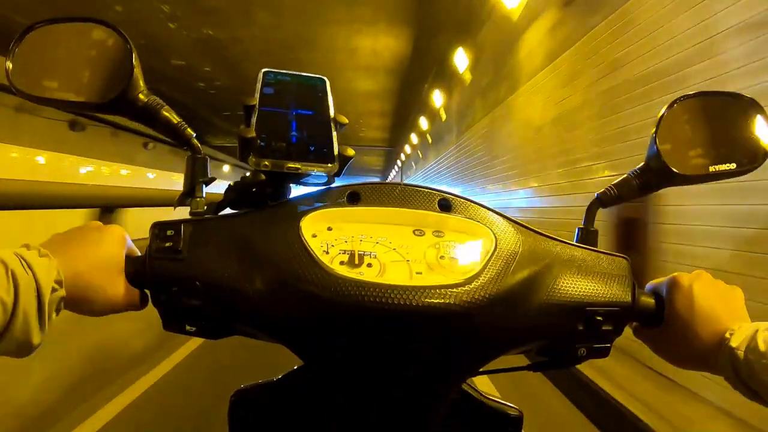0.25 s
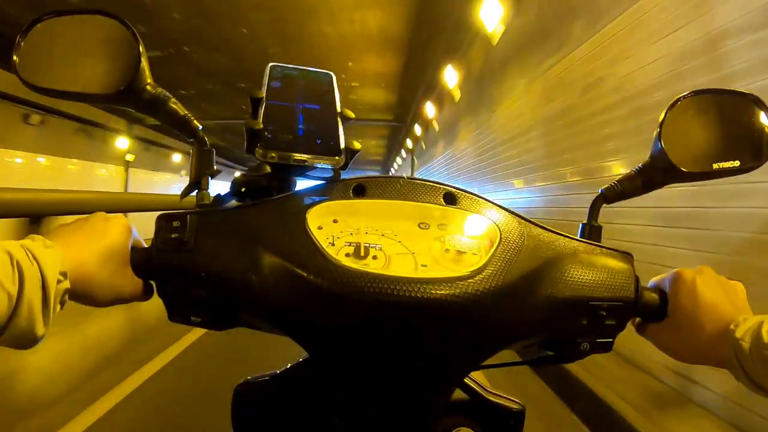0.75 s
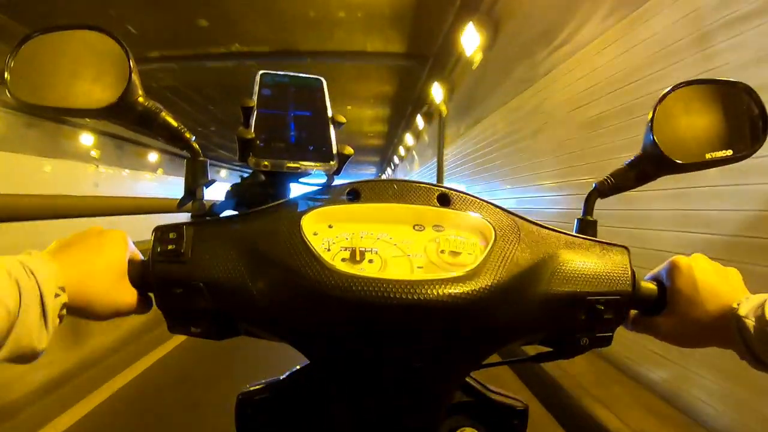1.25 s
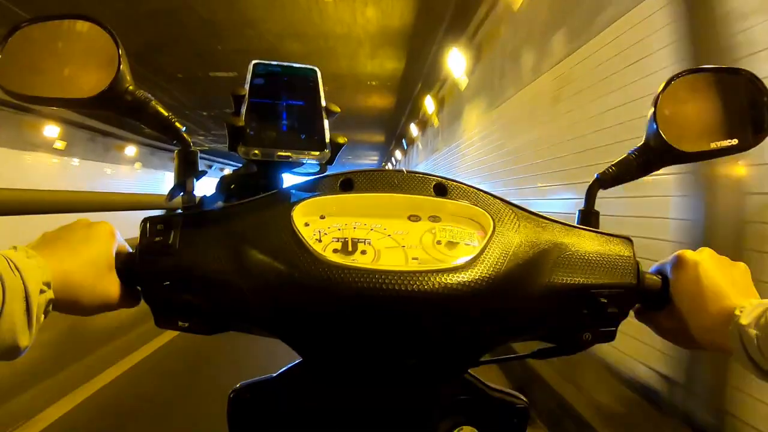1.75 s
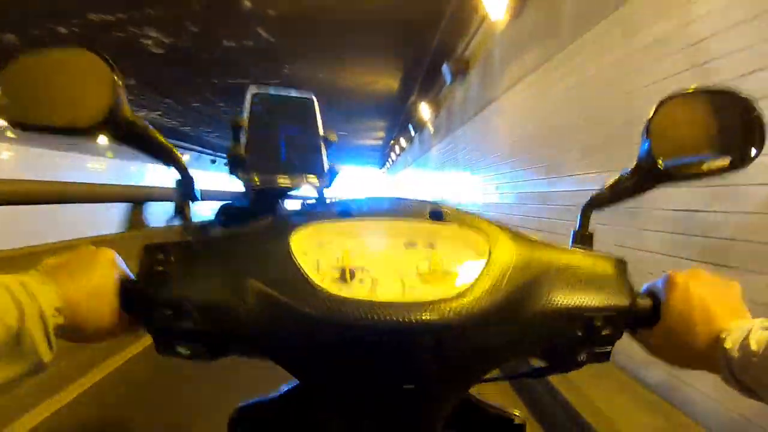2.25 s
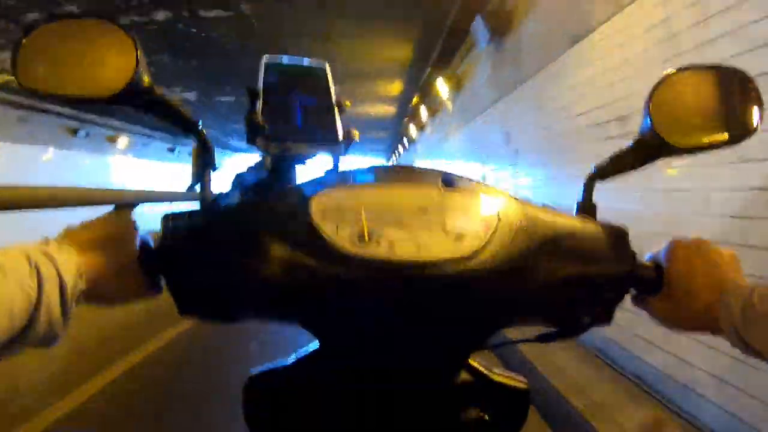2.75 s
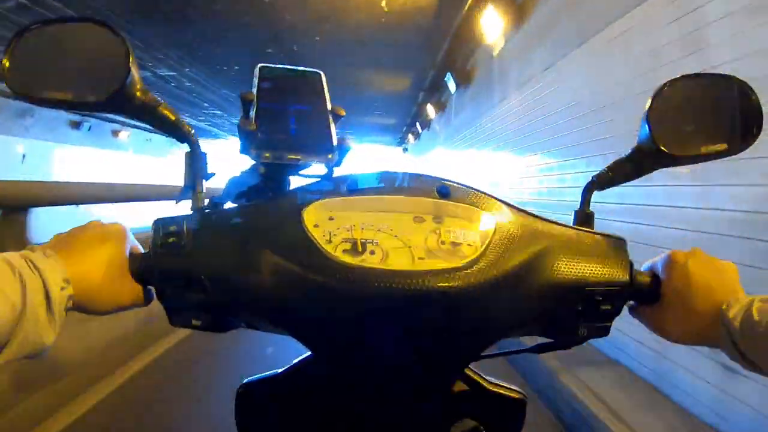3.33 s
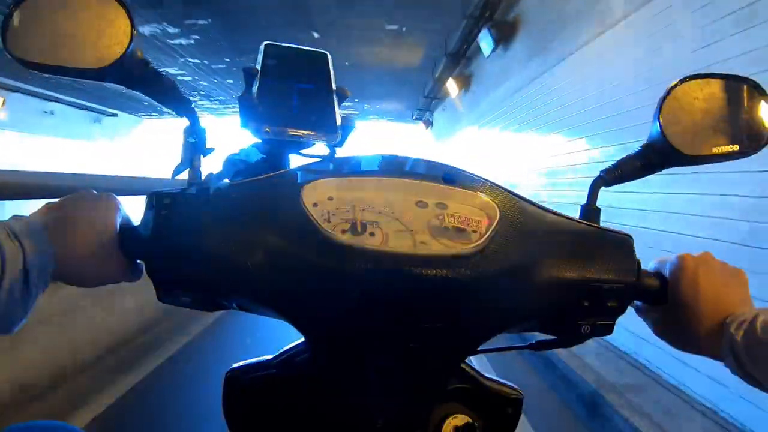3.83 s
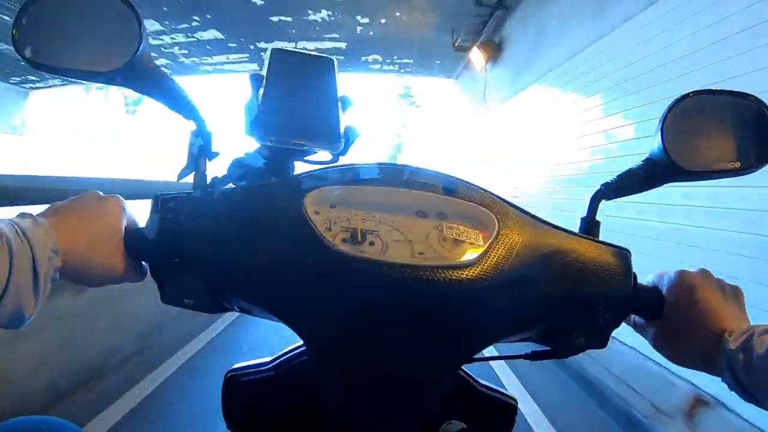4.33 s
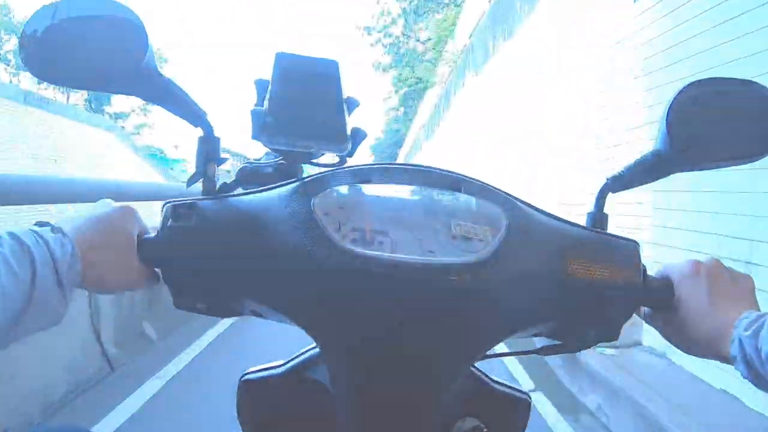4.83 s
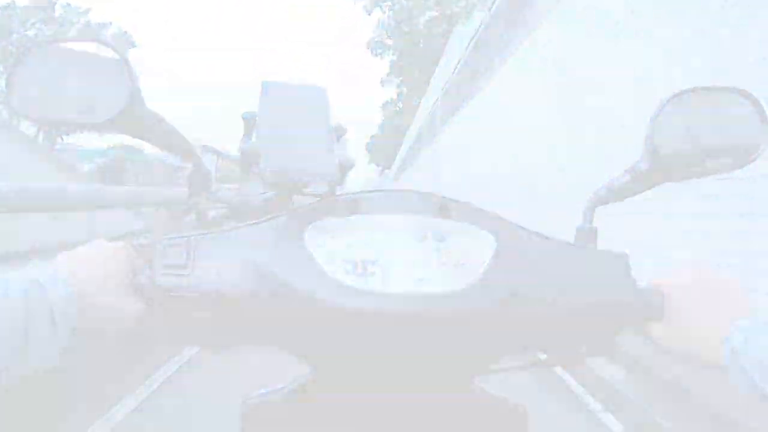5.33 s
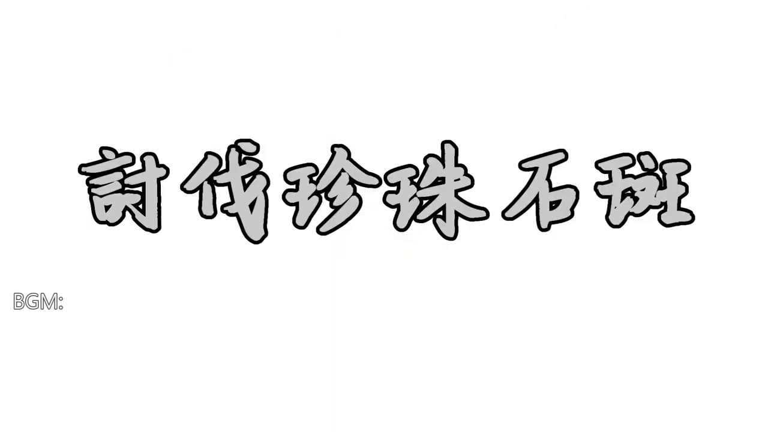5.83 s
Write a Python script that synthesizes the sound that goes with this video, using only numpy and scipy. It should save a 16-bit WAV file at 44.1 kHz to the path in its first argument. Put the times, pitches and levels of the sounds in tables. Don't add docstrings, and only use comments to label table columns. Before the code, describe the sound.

Heavy wind rumble and tunnel roar surround a humming scooter engine, with rattling plastic and dull panel knocks until the sound stops dead.

```python
import sys
import numpy as np
from scipy import signal
from scipy.fft import rfft, irfft, next_fast_len
from scipy.io import wavfile
from scipy.ndimage import uniform_filter1d, minimum_filter1d, map_coordinates

SR = 44100
rng = np.random.default_rng(int(sys.argv[2]) if len(sys.argv) > 2 else 0)


def pcm_store(signal):
    levels = np.round(np.clip(np.atleast_2d(signal), -1, 1) * 32767)
    wavfile.write(sys.argv[1], SR, levels.astype(np.int16).T)


def boost_factor(decibels):
    exponent = np.asarray(decibels, float) / 20
    return 10 ** exponent


N = 268200


def unit(x):
    return x / np.sqrt(np.mean(x ** 2) + 1e-20)


def curves(rows):
    s, *cols = np.transpose(rows)
    return [np.interp(np.arange(N) / SR, s, c) for c in cols]


def coarse(shape):
    t = np.arange(0, N / SR, .002)
    return np.interp(np.arange(N) / SR, t, shape(t))


def wobble(rate):
    knots = rng.standard_normal(int(N * rate / SR) + 4)
    return coarse(lambda t: map_coordinates(knots, [t * rate]))


def humps(rows):
    return coarse(lambda t: sum(db * np.exp(-2 * ((t - s) / width) ** 2) for s, db, width in rows))


def filtered(x, response):
    m = next_fast_len(N + 8192)
    return irfft(rfft(x, m) * response(np.fft.rfftfreq(m, 1 / SR)), m)[:N]


def rush(spectrum, patchy_db):
    z = signal.stft(rng.standard_normal(N), nperseg=512)[2]
    field = uniform_filter1d(rng.standard_normal(z.shape), size=6, axis=0)
    field = uniform_filter1d(field, size=10, axis=1)
    x = signal.istft(z * boost_factor(patchy_db * unit(field)), nperseg=512)[1][:N]
    hz, db = np.transpose(spectrum)
    return unit(filtered(x, lambda f: boost_factor(np.interp(np.log(f + 1), np.log(hz), db))))


def tone(cycles, db, unsteady_db, drift):
    size_db = unsteady_db * (0.62 * wobble(7) + 0.75 * wobble(24))
    return np.sqrt(2) * boost_factor(db + size_db) * np.sin(2 * np.pi * cycles + drift * wobble(9))


def blips(s, db, hz, rise):
    u = np.arange(1 + int(14 * rise * SR)) / SR / rise
    envelope = (u / 2) ** 2 * np.exp(2 - u)
    rows = boost_factor(db)[:, None] * envelope * np.sin(2 * np.pi * np.outer(hz, u * rise))
    at = (s * SR).astype(int)[:, None] + np.arange(len(u))
    return np.bincount(at.ravel(), rows.ravel(), N + len(u))[:N]


# time_s, firing_rate_hz
ENGINE_SPEED = [(0, 42.75), (.6, 43.2), (.95, 43.2), (1.3, 41.85), (1.6, 40.9), (1.85, 40.6), (2.1, 41.13),
                (2.5, 41.7), (2.8, 41.85), (3.6, 41.87), (4.2, 43.13), (4.6, 43.48), (5.53, 44.1)]


def firing():
    rate, = curves(ENGINE_SPEED)
    return rate, np.cumsum(rate) / SR


# order, level_db
STEADY_ORDERS = [(1, -41), (2, -41), (5, -45), (16, -57), (23, -55), (24, -59), (29, -59), (33, -56),
                 (34, -58), (37, -54), (38, -56), (58, -63), (60, -63)]
# order, start_s, length_s, level_db
BOOMS = [(8, .07, .45, -41), (8, .77, .2, -37), (8, .8, .55, -43), (8, 2.0, .3, -48), (8, 2.52, .2, -40),
         (8, 2.8, .33, -39), (8, 3.2, .27, -45), (8, 3.7, .58, -40), (8, 3.88, .33, -33.5),
         (8, 4.28, .5, -40), (8, 4.85, .75, -44), (8, 5.3, .3, -42), (9, 0, .5, -42), (9, .95, .35, -46),
         (9, 1.95, .28, -47), (9, 2.35, .32, -41), (9, 2.72, 1.22, -44), (9, 3.55, .15, -48),
         (9, 4.06, .58, -40), (9, 4.75, .35, -41), (11, .1, .6, -52), (11, 1.77, 1.35, -45),
         (11, 2.38, .25, -46), (11, 4.13, .35, -47), (11, 4.55, .72, -44), (11, 5.33, .2, -46),
         (4, .15, .25, -40), (4, .45, .32, -35), (4, 1.25, .2, -39), (4, 1.95, .45, -38),
         (4, 2.55, .6, -36.5), (4, 3.25, .5, -39), (4, 4.5, .55, -36), (4, 5.05, .45, -41),
         (12, 3.85, .45, -52), (12, 0, .7, -53), (36, 1.9, .25, -53), (36, 3, .6, -56),
         (36, 3.83, .22, -50), (36, 4.25, .6, -53), (36, 5.1, .2, -51)]


def engine():
    turns = firing()[1]
    rest_db, rise_s = -55.5, .12

    def swell(t, start, length):
        edge = np.minimum(t - start, start + length - t)
        return np.clip(edge / rise_s + .5, 0, 1)

    def size(k):
        spells = [row[1:] for row in BOOMS if round(row[0]) == k]
        return boost_factor(rest_db) + coarse(lambda t: sum(boost_factor(db) * swell(t, s, length) for s, length, db in spells))

    lifted = sum(size(k) * tone(k * turns, 0, unsteady_db=1.5, drift=.7) for k in (4, 8, 9, 11, 12, 36))
    steady = sum(tone(np.round(k) * turns + rng.random(), db, unsteady_db=4.5, drift=0.65)
                 for k, db in STEADY_ORDERS)
    return lifted + steady


# time_s, mesh_rate_hz
GEAR_MESH = [(0, 2700), (.15, 2712), (.45, 2722), (1, 2717), (1.6, 2673), (3.5, 2630), (3.8, 2645),
             (4.15, 2685), (4.6, 2697), (4.75, 2716), (5, 2710), (5.25, 2722), (5.53, 2729)]
# peak_s, loss_db, width_s
BACKLASH = [(.8, 8, .1), (.66, 4, .05), (1.06, 7, .08), (1.2, 6, .15), (3.95, 10, .1), (4.36, 12, .13),
            (5.09, 16, .09), (3.8, -11, .04), (4.72, -3, .08), (5.4, -4, .07), (4.13, -7, .06),
            (4.5, 3, .06), (4.98, 5, .06), (0, 5, .05), (.15, -2, .1)]
CRUISE_HZ, PULL_HZ = 41.9, 42.9


def gear():
    rate = firing()[0]
    slack = np.clip((PULL_HZ - rate) / (PULL_HZ - CRUISE_HZ), 0, 1) ** 2
    extra_hz = np.maximum(rate - PULL_HZ, 0)
    db = -57.5 - 20.5 * slack + 1.3 * extra_hz - humps(BACKLASH)
    return tone(np.cumsum(curves(GEAR_MESH)[0]) / SR, db, unsteady_db=1.3, drift=.7)


# frequency_hz, density_db (per Hz)
BUFFET = [(6, -37), (10, -9.5), (25, -0.5), (37, 1), (70, 1.5), (110, -4), (180, -21.5), (400, -71),
          (1500, -130)]
# frequency_hz, density_db (per Hz)
FLUTTER = [(40, -44.5), (90, -5), (140, -1.5), (180, -1.5), (260, -8.5), (330, -14), (500, -31.5),
           (900, -74.5), (3000, -130)]
# peak_s, change_db, width_s
GUSTS = [(.06, 2.5, 0.027), (.12, -8, 0.047), (.46, -1, 0.066), (.62, -2.5, 0.18), (.97, 2.5, .04),
         (1.08, -1, 0.046), (1.15, 1, 0.078), (1.74, -4, 0.039), (1.86, 2, .06), (2.07, 3.5, 0.068),
         (2.33, -2, 0.086), (2.6, 1, .06), (2.79, 7.5, 0.06), (2.85, -2, 0.025), (2.91, 4, 0.064),
         (3.45, 3.5, 0.13), (3.57, -4, 0.066), (3.88, 3, 0.18), (4.17, 2.5, 0.062), (4.23, -7, 0.034),
         (4.36, 4.5, 0.068), (4.43, -5, 0.054), (4.54, 7, 0.044), (4.63, 1, .06), (4.78, 0.5, 0.12),
         (4.98, 6, 0.043), (5.04, -8, 0.047), (5.1, 1.5, .06), (5.35, 2.5, 0.41), (.39, 5.5, 0.058),
         (1.58, -5, 0.04), (2.2, 2.5, .05), (3.68, 0, 0.046), (2.38, 2.5, 0.052), (4.2, -0.5, 0.057),
         (4.83, 5, 0.056), (5.17, 2.5, 0.13), (2.62, 2.5, .03), (3.47, -1, 0.046), (1.72, 1.5, .04)]


def wind():
    gust_db = humps(GUSTS)
    eddy = wobble(26)
    beat = np.cos(2 * np.pi * firing()[1] + 1.1 * wobble(4.8))
    buffet = unit(boost_factor(0.23 * eddy) * rush(BUFFET, patchy_db=0.36))
    flutter_db = 0.44 * eddy + 1.43 * wobble(40) + .2 * wobble(3.9) + 1.0 * beat
    flutter = unit(boost_factor(flutter_db) * rush(FLUTTER, patchy_db=.5))
    return boost_factor(-24 + gust_db) * buffet + boost_factor(-28 + 0.35 * gust_db) * flutter


# frequency_hz, density_db (per Hz)
ROAR = [(60, -69.5), (150, -24.5), (300, 2), (420, 3), (520, -0.5), (780, -3.5), (990, -3.5), (1390, -6),
        (1550, -8), (1850, -11), (2180, -28.5), (3000, -32), (5000, -70), (9000, -120)]
# frequency_hz, density_db (per Hz)
HISS = [(500, -74), (1200, -32.5), (2000, 0), (2700, -1), (3320, -3), (4200, -7), (4900, -8.5),
        (5600, -15.5), (6800, -25.5), (9000, -59.5), (13000, -100)]
# frequency_hz, density_db (per Hz)
AIR = [(2500, -73.5), (4500, -31), (6200, 0), (6900, -5), (7600, -0.5), (7950, 2), (8300, -2.5),
       (10200, -4.5), (11500, -15), (12300, -24.5), (13400, -21), (14200, -24), (15100, -26),
       (15700, -29.5), (20000, -90.5)]
# peak_s, loss_db, width_s
ROAR_DIPS = [(1.6, 4, 0.067), (1.71, 0, .04), (2.45, -1.5, 0.16), (2.68, 0.5, 0.13), (3.5, 2, 0.044),
             (4.95, -0.5, 0.066), (.15, 2, .04), (.95, 0, 0.078), (2.1, 0, 0.033), (3.07, 2, 0.16),
             (3.6, 0, 0.07), (4.3, 0, .06), (3.18, 2.5, 0.052), (3.34, 2.5, 0.036), (3.46, 2, .045),
             (5.3, 3, 0.022), (5.5, -0.5, 0.1)]


def road():
    t = np.arange(N) / SR
    rate, turns = firing()
    pull = rate - CRUISE_HZ
    wall_db = 1.46 * np.clip((t - 3.71) / 0.17, 0, 1) - humps(ROAR_DIPS)
    bump = 0.53 * wobble(17) + 0.68 * wobble(36) + 1.8 * wobble(70)
    beat = np.cos(2 * np.pi * turns + 1.5 * wobble(5.3))
    roar = unit(boost_factor(1.0 * bump + 0.65 * beat) * rush(ROAR, patchy_db=0.4))
    hiss = unit(boost_factor(0.45 * bump + 0.55 * beat + 0.36 * wobble(70)) * rush(HISS, patchy_db=0.7))
    air = unit(boost_factor(.5 * bump + 0.59 * wobble(80)) * rush(AIR, patchy_db=0.8))
    roar_db = -32.5 + 0.11 * pull + wall_db
    hiss_db = -48.5 + 0.44 * pull + 0.59 * wall_db
    air_db = -67 + 0.59 * pull + .5 * wall_db
    return boost_factor(roar_db) * roar + boost_factor(hiss_db) * hiss + boost_factor(air_db) * air


def tap(s, body_db, body_hz, edge_db, snap_db):
    s, flat = s + .0003, np.ones(len(s))
    body = blips(s, body_db + 1, body_hz, rise=.00042)
    edge = blips(s, edge_db + 7, 2800 * flat, rise=.00032)
    catch = blips(s, snap_db + 7.5, 4400 * flat, rise=.00034)
    return body + edge + catch


# start_s, peak_db, edge_db, catch_db
TICKS = [(.085, -23, -5, -8), (0.136, -25, -8, -9), (.3135, -28, 3, 0), (.352, -24, -4, -8),
         (.718, -43, 0, 0), (0.8157, -20, 0, -5), (0.86, -30, 2, 0), (0.973, -22.5, -3, -4),
         (1.093, -25, 5, -6), (1.4522, -18, 4.5, 6.5), (1.4555, -30, 4, 4), (1.463, -36, 0, 3.5),
         (1.473, -34.5, 6.5, 4), (1.57, -32, 8, -2), (1.983, -26, -2.5, -5), (2.092, -32, 10, 3),
         (2.35, -32, 4, 6), (2.47, -24.5, 6, 0), (2.8157, -20, -0.5, -8), (2.868, -27, -1, 0),
         (3.106, -24.5, 1, 9), (3.2835, -34, -2, -6), (3.812, -25, 6.5, -1), (3.835, -35, 5, 2),
         (3.919, -28, 8.5, 1), (4.096, -30, 8, 0), (4.146, -23.5, 0, 2), (4.231, -28.5, 4, 0),
         (4.365, -21, -1, -8), (4.5116, -30, 4, -2), (4.8172, -22.5, 7, -5), (4.846, -23, 9, 10),
         (4.862, -38, 3, 15), (4.878, -29, 0.5, 0), (4.9082, -29, 2, 2.5), (4.998, -25, 5, 6),
         (5.1297, -30, 7, 5), (5.2708, -20.5, -1, 0), (2.669, -24.5, 1, -1), (4.672, -27, 6, -2)]


def ticks():
    when, size, pitch, edge = rng.random((450, 4)).T
    rattle_db = -37 - 3 * np.log(size + .1)
    rattle_edge_db = rattle_db - 18 - 6 * edge
    rattle = tap(when * N / SR, rattle_db, 1100 + 900 * pitch, rattle_edge_db, rattle_edge_db - 10)
    s, db, edge_db, snap_db = np.transpose(TICKS)
    panel_hz = 1640 + 90 * rng.standard_normal(len(s))
    body_db = db - 3.2
    return tap(s, body_db, panel_hz, body_db - 17 + edge_db, body_db - 27 + snap_db) + rattle


# start_s, peak_db, pitch_hz
KNOCKS = [(0.1363, -21, 1290), (0.1845, -19, 950), (0.7183, -31, 1130), (1.045, -18, 1330),
          (1.3084, -23, 1320), (1.4521, -22, 1090), (2.0905, -22, 1100), (2.4695, -21, 950),
          (2.5087, -24, 1380), (2.6309, -19.5, 1050), (2.6678, -17.5, 1060), (3.7264, -22.5, 1020),
          (3.8097, -20, 1180), (3.8325, -24, 1050), (3.9828, -24, 1540), (4.0442, -23, 802),
          (4.1445, -28.5, 1120), (4.2048, -24.5, 1540), (4.2527, -20, 1340), (4.5381, -20, 1240),
          (4.6718, -27, 1030), (4.6917, -25, 1240), (4.8174, -22.5, 939), (4.9506, -22, 1260),
          (5.037, -19, 1300)]


def knocks():
    s, db, hz = np.transpose(KNOCKS)
    return blips(s + .0005, db - 3.5, hz, rise=0.00065)


# start_s, length_s, level_db
SCUFFS = [
    (2.226, .024, -53.5),
    (3.105, .006, -57),
    (.325, .012, -60),
    (2.236, .008, -53),
]
# frequency_hz, density_db (per Hz)
SCUFF_COLOUR = [(2500, -30), (3900, 0), (5200, -8), (6200, 0), (7000, -9), (8500, -12), (10500, -30),
                (14000, -60), (18000, -100)]


def scuffs():
    t = np.arange(N) / SR
    shape = sum(boost_factor(db) * np.sin(np.pi * np.clip((t - s) / length, 0, 1)) for s, length, db in SCUFFS)
    return shape * rush(SCUFF_COLOUR, patchy_db=.8)


# start_s, peak_db, pitch_hz
SLAPS = [(.436, -10.5, 124), (.536, -15.5, 184), (0.722, -13, 185), (.949, -20, 306), (1.094, -17, 286),
         (1.152, -18, 279), (1.256, -9.5, 147), (1.399, -14, 177), (1.521, -16, 151), (1.945, -12, 114),
         (2.051, -18, 189), (2.133, -21, 111), (2.265, -14.5, 245), (2.492, -18, 321), (2.806, -13, 110),
         (2.859, -15, 120), (2.918, -13.5, 180), (3.285, -9, 183), (3.392, -13.5, 189), (3.751, -14, 124),
         (4.181, -8.5, 150), (4.51, -16, 113), (4.526, -17, 313), (4.582, -20.5, 304), (4.801, -15, 181),
         (4.892, -14, 193), (4.971, -22, 181), (5.122, -14.5, 111), (5.17, -11, 174), (5.245, -13, 124),
         (5.387, -11, 180), (5.387, -13.5, 308), (5.411, -10.5, 115), (5.497, -10, 109), (5.531, -17.5, 90),
         (1.3, -18.5, 260), (2.81, -19, 270), (4.39, -18.5, 280)]


def slaps():
    s, db, hz = np.transpose(SLAPS)
    return blips(s, db - 5, hz, rise=0.0035)


def scene():
    steady = engine() + gear() + wind() + road()
    return (steady + ticks() + knocks() + scuffs() + slaps())[None]


# frequency_hz, share_of_frames
HOLES = [(7000, 0), (10500, .02), (11400, .1), (12000, .35), (12700, .08), (13900, .08), (14400, .6),
         (15200, .8), (15800, 1)]
# peak_s, extra_share, width_s
THIN_MOMENTS = [(.38, .3, .03), (.85, .15, .04), (1.31, .3, .03), (1.8, .5, .09), (2.3, .25, .05),
                (2.44, .2, .04), (2.57, .3, .04), (2.94, .3, .04), (3.3, .2, .03), (3.53, .2, .03),
                (4.07, .25, .03), (4.3, .25, .04), (4.89, .3, .03), (5.06, .3, .04), (5.18, .25, .05),
                (5.49, .2, .03)]


def thinned(x):
    hz, t, z = signal.stft(x, SR, nperseg=2048)
    band = (hz // 280).astype(int)
    treble = np.clip((hz[:, None] - 7500) / 2000, 0, 1)
    short = np.interp(t, np.arange(N) / SR, humps(THIN_MOMENTS)) * treble
    luck = rng.random((band.max() + 1, len(t) // 2 + 1))[band][:, np.arange(len(t)) // 2]
    together = np.where(hz[:, None] > 14200, luck[-1], luck)
    keep = together > np.interp(hz, *np.transpose(HOLES))[:, None] + short
    return signal.istft(z * np.where(keep | (t < .04), 1, .1), SR, nperseg=2048)[1][:, :N]


def low_pass(x):
    return signal.sosfilt(signal.butter(12, 15600, fs=SR, output="sos"), x)


def record(dry):
    need = np.minimum(1, (0.42 / (np.abs(dry) + 1e-9)) ** 0.74)
    gain = minimum_filter1d(need, size=441)
    gain = uniform_filter1d(uniform_filter1d(gain, size=221), size=221)
    left = 5.5395 - np.arange(N) / SR
    fade = np.clip(left / .00012, 0, 1) * np.clip(.65 + left / .06, 0, 1)
    mix = thinned(dry * gain) * fade
    return low_pass(mix)


dry = scene()
out = record(dry)
pcm_store(out)
```